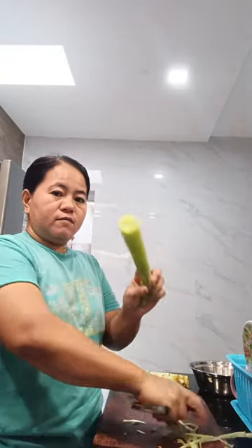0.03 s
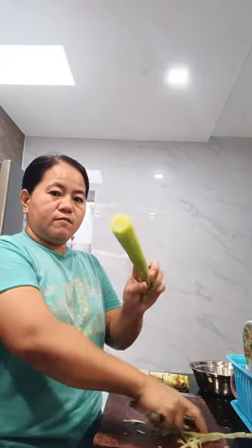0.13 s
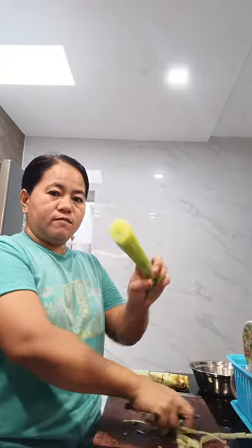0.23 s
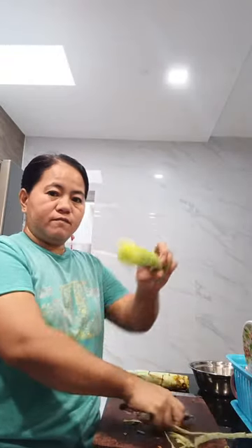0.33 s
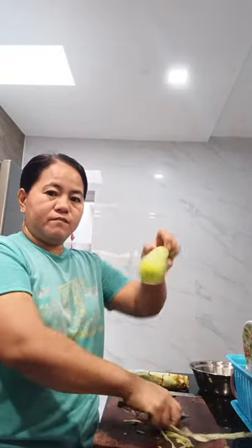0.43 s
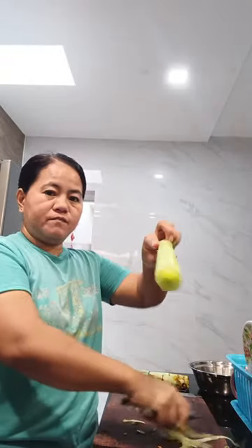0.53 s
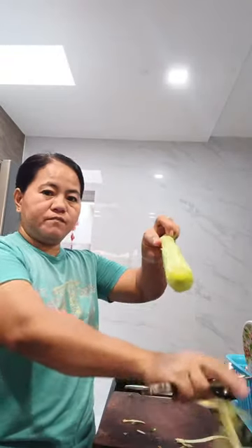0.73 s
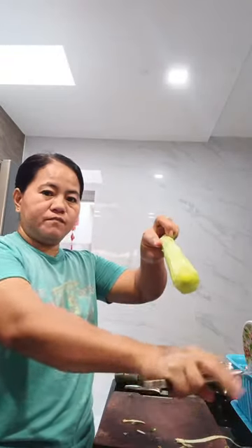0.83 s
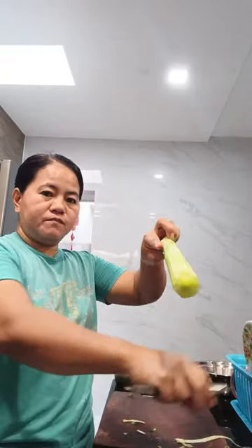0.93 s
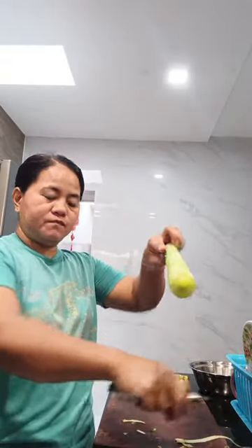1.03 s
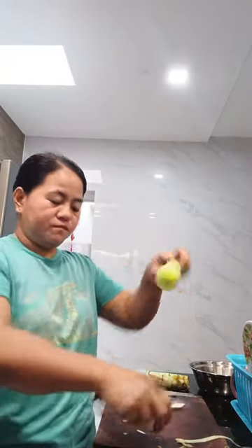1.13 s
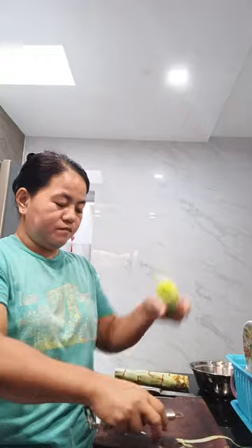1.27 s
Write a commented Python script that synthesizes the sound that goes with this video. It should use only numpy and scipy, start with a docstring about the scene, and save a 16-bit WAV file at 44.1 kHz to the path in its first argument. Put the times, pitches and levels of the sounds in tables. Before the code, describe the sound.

A knife chops a vegetable stem on a thick board. An earlier chop is dying away at the start, and a louder one lands at 0.2 seconds with a sharp clack and thud, ringing briefly off the tiled kitchen walls. Faint clicks come around 0.5 and 0.85 seconds, then a lighter knock just after 1 second. Quiet room noise with a faint hum and whine lies underneath.

```python
"""Knife chopping a vegetable stem

Thick board, small tiled kitchen. One chop dies away as the next lands: the blade clacks and chatters,
the board thuds, the walls ring on. Faint clicks and a lighter knock follow as knife and stem touch
the board. Underneath: quiet room noise, a low hum and a faint whine."""
import sys
import numpy as np
from scipy import signal
from scipy.fft import rfft, irfft
from scipy.io import wavfile

SR = 44100
rng = np.random.default_rng(int(sys.argv[2]) if len(sys.argv) > 2 else 0)


def transcribe(u):
    """Save the signal u as a 16-bit wav file named by the first command-line argument.

    u: samples, shape (n,) or (channels, n), limited to [-1, 1]; the rate is SR.
    q: integer samples, one column per channel.
    """
    v = np.clip(np.atleast_2d(u).T, -1, 1)
    q = np.round(v * 32767).astype(np.int16)
    wavfile.write(sys.argv[1], SR, q)


N = 57330

# chops (time [s], then gain [dB] of thud, board knock, low mids, clack range, upper mids, treble)
CHOPS = [(-.03, -6.5, -44.5, -20.5, -0.5, -16.5, -17.5), (0.2115, 2.5, -1, 0, 0, 2, 0)]
# anchors of those six gains (frequency [Hz])
CHOP_BANDS_HZ = [150, 300, 1500, 2700, 5800, 11000]
# blade on the board (frequency [Hz], width [Hz], level [dB], t60 [s], pan L-R [dB])
BLADE_MODES = [(1383, 130, -46.5, 0.29, 4.5), (1712, 260, -42.5, 0.55, 4), (2422, 57, -42, 0.38, 8),
               (2658, 196, -39.5, 0.52, 8), (2964, 130, -46.5, 0.5, 2), (4176, 83, -40, 0.31, 23.5),
               (4316, 70, -41, 0.48, 10), (4830, 170, -42.5, 0.51, -2), (6350, 230, -37.5, 0.56, 5.5),
               (8534, 39, -46, 0.46, 15.5), (9860, 660, -40.5, 0.44, 21), (10680, 50, -35.5, 0.32, -8),
               (10770, 195, -34.5, .36, -7), (12660, 60, -39.5, 0.2, 2), (13380, 220, -36, 0.18, -9.5),
               (15000, 380, -33.5, 0.25, -4)]
# board and counter (frequency [Hz], width [Hz], level [dB], t60 [s], pan L-R [dB])
BOARD_MODES = [(133, 15, -58.5, 1.27, 0), (263, 86, -41, 0.24, 3), (299, 90, -49.5, 0.65, 2),
               (445, 58, -45.5, 0.2, -4), (630, 148, -51.5, 0.31, 2.5), (1000, 133, -63, 1.2, 18)]
# crack of the cut off the walls (frequency [Hz], relative density [dB], t60 [s], pan L-R [dB])
CRACK_BANDS = [(283, -13.5, 0.78, 0), (800, -23, .5, 3), (1146, -27, 0.65, 7), (1610, 0, 0.46, 8),
               (3430, -3.5, 0.5, 3), (5860, -1.5, .45, 6.5), (7160, -2, 0.39, 4.5), (7910, -9, 0.23, -5),
               (9200, -0.5, 0.37, -2), (11100, -9, 0.34, 6), (12400, -16, 0.41, -6),
               (15000, -6.5, 0.25, 10.5)]
# blade bounces (time [s], level [dB])
BOUNCES = [(0.213, -37), (0.2226, -25), (0.2298, -23), (.2338, -24), (0.242, -31)]
# light knocks (time [s], body level [dB], scrape level [dB])
KNOCKS = [(1.035, -66, -55.5), (1.0501, -46, -53), (1.0635, -57, -48)]
# knock body (frequency [Hz], width [Hz], relative level [dB], t60 [s], pan L-R [dB])
KNOCK_MODES = [(226, 54, -11.5, 0.18, -0.5), (1042, 42, -5, 0.16, 1.5), (1442, 75, -6, 0.17, 3),
               (1896, 350, -12, 0.51, 7), (2204, 32, -11, 0.12, 4), (2800, 840, -8, 0.26, 5)]
# knock scrape (frequency [Hz], relative density [dB], t60 [s], pan L-R [dB])
SCRAPE_BANDS = [(313, -10, 0.29, -5), (804, 6, 0.41, -0.5), (2490, -1.5, 0.28, 7), (4250, 3.5, 0.26, 1),
                (6760, 3, .24, 3), (7900, -9, .2, 14), (10300, 5, 0.23, 3), (12600, -26, 0.16, -7),
                (15300, -3.5, .18, -9)]
# handling clicks and bumps (time [s], frequency [Hz], width [Hz], level [dB], t60 [s], pan L-R [dB])
CLICKS = [(.401, 5000, 3000, -61, .08, 2), (0.503, 15300, 1540, -61, .25, -13),
          (0.515, 9500, 5800, -65.5, 0.098, 15), (0.8438, 4695, 335, -53, 0.051, 21),
          (.8435, 6160, 506, -65.5, 0.14, 10), (0.843, 12600, 700, -63, 0.1, -4),
          (0.8442, 9700, 5010, -66.5, 0.065, 8), (.864, 4320, 262, -62, 0.088, 10),
          (0.846, 2380, 1100, -70, 0.51, 6), (.96, 320, 89, -70.5, 0.46, -1.5),
          (1.0645, 5500, 6440, -41, 0.023, 3), (1.065, 10150, 220, -49, 0.057, 13),
          (1.078, 313, 88.4, -54, 0.22, 6.5), (1.084, 153.5, 30.2, -61.5, 0.27, 5),
          (1.117, 1980, 1200, -58, .15, 6), (1.138, 1800, 1500, -56.5, .08, -2),
          (1.198, 6920, 9000, -69, .3, 6)]
# room noise spectrum (frequency [Hz], relative density [dB])
ROOM_SPECTRUM = [(25, 0.5), (70, -1), (135, 1), (200, -8), (300, -4.5), (520, -10.5), (720, -12),
                 (1200, -11.5), (2600, -11.5), (3400, -17.5), (4500, -13), (8200, -22), (10300, -7),
                 (12500, -20), (15400, -21)]
# room noise envelope (time [s], level [dB])
ROOM_LEVEL = [(0, -65.5), (.45, -66), (.62, -64.5), (.78, -66.5), (1.0, -66.5), (1.3, -67)]
# hum envelope (time [s], level [dB])
HUM_LEVEL = [(0, -94), (.42, -69.5), (.5, -71), (.56, -59.5), (.64, -62.5), (.69, -75.5), (.82, -94.5),
             (.88, -66), (.94, -77), (1.3, -95.5)]
# whine envelope (time [s], level [dB])
WHINE_LEVEL = [(0, -89.5), (.7, -91.5), (.9, -83), (1.2, -80.5), (1.3, -90)]

THUD_HZ, THUD_DB, CRACK_DB = 155.3, -38.5, -30  # levels before the chop's gains
CLACK_HZ, CLACK_DB, CLACK_AT_S, CLACK_LENGTH_S = 2664, -22, .2116, .0036
RISE_S, BOARD_RISE_S = .0015, .003
HUM_HZ, WHINE_HZ = 49, 696
TIME_S = np.arange(N) / SR
BINS_HZ = np.maximum(np.arange(N // 2 + 1) * SR / N, 1)


def chops():
    """Each chop rings blade and board, cracks and thuds; where the edge lands sets the colour."""
    out = 0
    for start_s, *colour_db in CHOPS:
        for modes, rise_s in ((BLADE_MODES, RISE_S), (BOARD_MODES, BOARD_RISE_S)):
            for hz, width_hz, db, t60_s, pan_db in modes:
                level_db = db + log_interp(hz, CHOP_BANDS_HZ, colour_db)
                out += ring(start_s, hz, width_hz, level_db, t60_s, pan_db, rise_s)
        crack = noise_burst(start_s, CRACK_BANDS, log_interp(BINS_HZ, CHOP_BANDS_HZ, colour_db))
        out += amp(CRACK_DB) * crack + thud(start_s, THUD_DB + colour_db[0])
    return out


def thud(start_s, db):
    """The struck board swings at one low pitch, slow to build."""
    swing = np.sin(2 * np.pi * THUD_HZ * (TIME_S - start_s))
    return amp(db) * swing * decay(start_s, t60_s=.31, rise_s=.032) * pan(5.5)


def clack():
    """The edge meets the board: a tone under a half-sine contact pulse."""
    age_s = TIME_S - CLACK_AT_S
    contact = np.sin(np.pi * np.clip(age_s / CLACK_LENGTH_S, 0, 1))
    return np.sqrt(2) * amp(CLACK_DB) * contact * np.sin(2 * np.pi * CLACK_HZ * age_s) * pan(14)


def chatter():
    """The blade chatters brightly as it settles."""
    return sum(ring(start_s, hz=11230, width_hz=3300, db=db, t60_s=.02, pan_db=-6, rise_s=.0011)
               for start_s, db in BOUNCES)


def knocks():
    """Knife and stem brush the board and come down lightly."""
    out = 0
    for start_s, body_db, scrape_db in KNOCKS:
        out += amp(scrape_db) * noise_burst(start_s, SCRAPE_BANDS)
        for hz, width_hz, db, t60_s, pan_db in KNOCK_MODES:
            out += ring(start_s, hz, width_hz, db + body_db, t60_s, pan_db)
    return out


def clicks():
    """Faint handling clicks and bumps, one resonance each."""
    return sum(ring(*click, rise_s=.00073) for click in CLICKS)


def room_noise():
    """Quiet diffuse noise; the mids lean left."""
    pan_db = log_interp(BINS_HZ, [200, 1200, 5000, 9000], [0, 4, 4, 0])
    spectrum_db = log_interp(BINS_HZ, *np.array(ROOM_SPECTRUM).T)
    return diffuse_noise(amp(spectrum_db + pan_db * np.array([[.5], [-.5]]))) * envelope(ROOM_LEVEL)


def room_tone(hz, levels):
    """Hum or whine: a sine that swells and fades."""
    return np.sqrt(2) * np.sin(2 * np.pi * (hz * TIME_S + rng.random())) * envelope(levels)


def ring(start_s, hz, width_hz, db, t60_s, pan_db, rise_s=.0016):
    """One struck resonance, blurred into a noise band by the walls."""
    fade = decay(start_s, t60_s, rise_s)
    band = diffuse_noise(ripple() / (1 + ((BINS_HZ - hz) / width_hz) ** 2) ** 2) * fade
    energy_gain = np.sqrt(np.sum(fade ** 2) / np.sum(band ** 2, axis=1, keepdims=True))
    return band * energy_gain * amp(db) * pan(pan_db)


def noise_burst(start_s, bands, colour_db=0):
    """Broad noise of a blow; each band has its own decay and pan."""
    hz, db, t60s_s, pans_db = np.array(bands).T
    spectrum = rfft(diffuse_noise(ripple() * amp(log_interp(BINS_HZ, hz, db)))) * amp(colour_db)
    out = 0
    for weights, t60_s, pan_db in zip(np.eye(len(hz)), t60s_s, pans_db):
        band = irfft(spectrum * log_interp(BINS_HZ, hz, weights), N)
        out += band * decay(start_s, t60_s, RISE_S) * pan(pan_db)
    return out


def diffuse_noise(shape, coherent_below_hz=607, left_lag_s=.0009):
    """Shaped stereo noise, rms 1; the bass is shared, slightly later on the left."""
    mid, side = np.exp(2j * np.pi * rng.random((2, N // 2 + 1)))
    coherence = 1 / (1 + (BINS_HZ / coherent_below_hz) ** 2)
    lag = np.exp(-2j * np.pi * BINS_HZ * left_lag_s * np.array([[1], [0]]))
    stereo = mid * np.sqrt(1 + coherence) + side * np.sqrt(1 - coherence) * np.array([[1], [-1]])
    noise = irfft(shape * lag * stereo, N)
    return noise / np.sqrt(np.mean(noise ** 2))


def ripple(depth_db=3.6, step_hz=26):
    """Random fine peaks and dips of many weak resonances."""
    peaks = rng.standard_normal(N // 2 + 1)
    return amp(depth_db * np.interp(BINS_HZ / step_hz, np.arange(len(peaks)), peaks))


def decay(start_s, t60_s, rise_s):
    """Quick rise, exponential decay."""
    age_s = np.maximum(TIME_S - start_s, 0)
    return (1 - np.exp(-age_s / rise_s)) * np.exp(-np.log(1000) * age_s / t60_s)


def envelope(levels):
    """Gain through (time [s], level [dB]) points."""
    return amp(np.interp(TIME_S, *np.array(levels).T))


def log_interp(hz, points_hz, values):
    """Interpolation over log frequency."""
    return np.interp(np.log(hz), np.log(points_hz), values)


def pan(db):
    """Constant-power gains for a left-right level difference."""
    gains = amp(np.array([[db], [-db]]) / 2)
    return gains / np.sqrt(np.mean(gains ** 2))


def amp(db):
    """Decibels to gain."""
    return 10 ** (np.asarray(db) / 20)


def scene():
    """Knife work over the room background."""
    knife = chops() + clack() + chatter() + knocks() + clicks()
    room = room_noise() + room_tone(HUM_HZ, HUM_LEVEL) * pan(-9) + room_tone(WHINE_HZ, WHINE_LEVEL)
    return knife + room


def record(dry):
    """Steep low-pass on the top treble."""
    cutoff_hz = 15450
    return signal.sosfilt(signal.ellip(10, .2, 80, cutoff_hz, fs=SR, output="sos"), dry)


dry = scene()
out = record(dry)
transcribe(out)
```